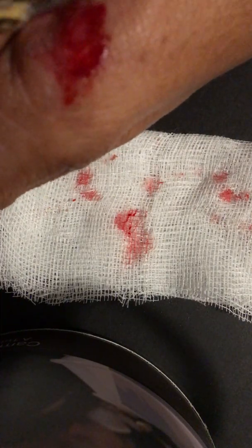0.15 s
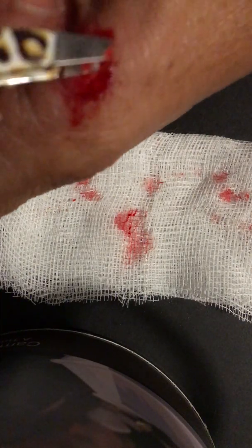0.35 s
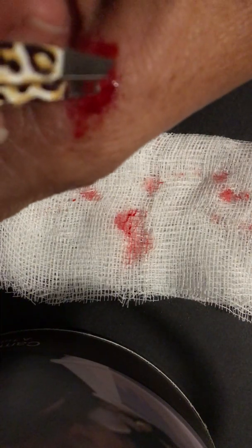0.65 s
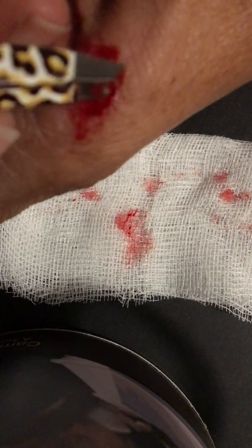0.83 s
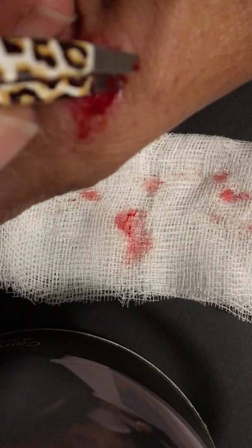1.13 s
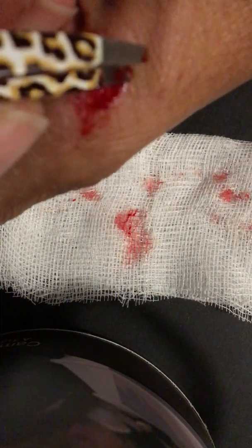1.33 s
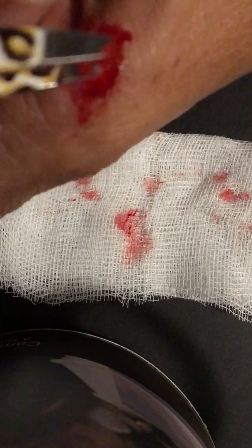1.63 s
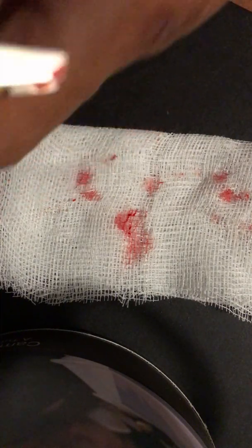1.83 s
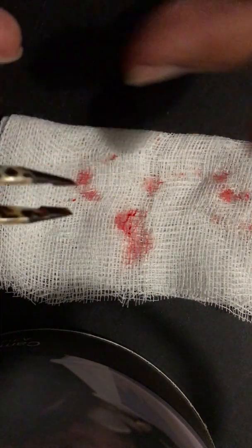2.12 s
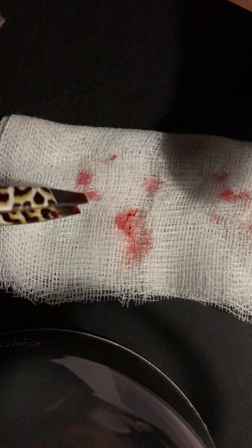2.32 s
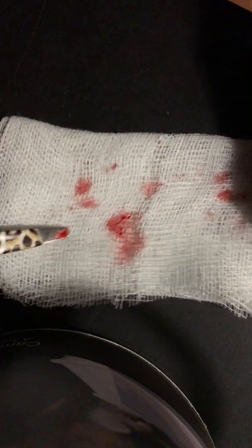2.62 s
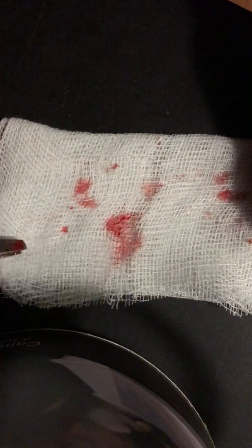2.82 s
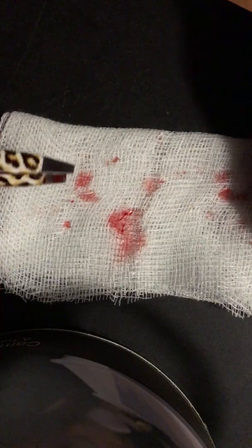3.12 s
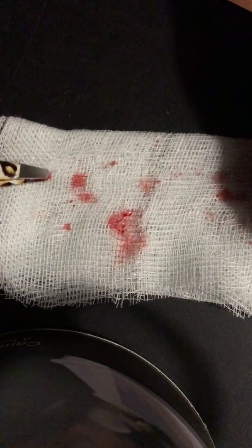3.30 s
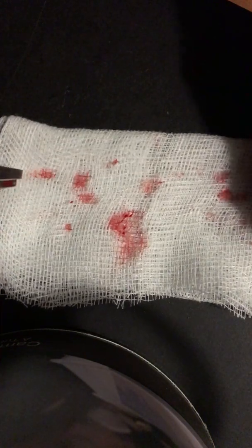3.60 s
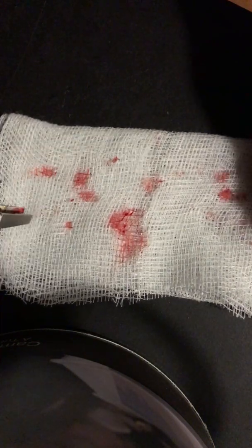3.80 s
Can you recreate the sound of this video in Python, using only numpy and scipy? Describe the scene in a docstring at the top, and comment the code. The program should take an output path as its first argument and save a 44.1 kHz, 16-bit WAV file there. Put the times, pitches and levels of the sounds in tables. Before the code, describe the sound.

Steel tweezers heard close in a quiet, slightly reflective room with low hiss and hum. A bright snap at 0.3 s, then near silence with dull hand bumps; soft rustling from 1.5 s. Small ticks around 2.2-2.4 s, a tap at 2.55 s, faint gauze scraping, a louder tap at 3.2 s, a barely audible thin squeak, scrapes and clicks to 3.7 s, then the loudest tap with rapid bounces at 3.9 s.

```python
"""Steel tweezers on a gauze-covered table

Close up in a quiet room: a snap, three taps with bounces, scrapes of the tips over gauze, a thin squeak.
Tweezer arms and table are sums of dying sines, driven by strikes, scuffs or random thread plucks.
Skin and cloth rustle as shaped noise; hands bump as sagging low sines; hiss, hum and rumble lie below.
"""
import sys
import numpy as np
from scipy import signal
from scipy.fft import rfft, irfft
from scipy.io import wavfile
from scipy.ndimage import uniform_filter1d

SR = 44100
rng = np.random.default_rng(int(sys.argv[2]) if len(sys.argv) > 2 else 0)


def wrap_up_sound(samples):
    """Save the sound to the file named by the first command line argument, as 16-bit audio."""
    columns = np.atleast_2d(samples).T
    # keep every value between -1 and 1, then stretch to whole-number steps
    tamed = np.clip(columns, -1, 1)
    steps = np.round(tamed * 32767).astype(np.int16)
    wavfile.write(sys.argv[1], SR, steps)


N = 174195


def gain_of(db):
    """Amplitude factor of a level in dB."""
    return 10 ** (np.asarray(db) / 20)


def unit_rms(x):
    """Scale to an RMS of 1."""
    return x / np.sqrt(np.mean(x ** 2) + 1e-20)


def read_curve(points, hz):
    """Interpolate a (frequency, value) table along log frequency."""
    point_hz, value = np.transpose(points)
    return np.interp(np.log(hz + 1), np.log(point_hz + 1), value)


def level(rows, column=1):
    """Gain over time from a dB column; -120 dB outside the table."""
    rows = np.array(rows)
    return gain_of(np.interp(np.arange(N) / SR, rows[:, 0], rows[:, column], -120, -120))


def add(mix, start_s, sound):
    """Add a sound in place, cut at the end of the mix."""
    part = mix[round(start_s * SR):][:len(sound)]
    part += sound[:len(part)]


def drift(size):
    """Slow random curve of unit RMS: white noise averaged over size samples."""
    return unit_rms(uniform_filter1d(rng.standard_normal(N), size=size))


def ring(modes, tilt_db_per_oct, size=6000):
    """Dying sines, tilted about 1 kHz; neighbouring modes start in opposite directions."""
    t = np.arange(size) / SR
    out = np.zeros(size)
    for k, (hz, db, t60_s) in enumerate(modes):
        mode_db = db + tilt_db_per_oct * np.log2(hz / 1000) - 60 * t / t60_s
        out += (-1) ** k * gain_of(mode_db) * np.sin(2 * np.pi * hz * t)
    return out


def patchy_noise(colour, patch_db):
    """Coloured noise whose level drifts in patches over time and frequency."""
    frames, hz = N // 128 + 5, np.fft.rfftfreq(512, 1 / SR)
    real, imag, patch = rng.standard_normal((frames, 257, 3)).T
    patch = uniform_filter1d(patch, size=10, axis=0)
    patch = unit_rms(uniform_filter1d(patch, size=14, axis=1))
    spectrum = (real + 1j * imag) * gain_of(read_curve(colour, hz)[:, None] + patch_db * patch)
    return unit_rms(signal.istft(spectrum, nperseg=512, noverlap=384)[1][:N])


# spectrum of the steady hiss: hz, level_db
HISS_COLOUR = [(12, -49), (20, -14.5), (33, -3.5), (54, -0.5), (76, -12), (285, -12), (502, -27),
               (546, -19), (884, -13), (962, -19), (1600, -23), (1740, -23.5), (7580, -34.5), (9230, -34.5),
               (17200, -43)]
# low rumble, before RUMBLE_TRIM_DB: time_s, level_db
RUMBLE_LEVEL = [(0.0, -69), (0.3, -65), (1.33, -70), (1.91, -59), (2.22, -69.5), (3.95, -61.5)]
HISS_DB, RUMBLE_TRIM_DB = -68, -3
HUM_HZ, HUM_DB = 51, -71.5


def room_tone():
    """Steady hiss, a hum of wavering pitch and a low rumble that swells."""
    hz = np.fft.rfftfreq(N, 1 / SR)
    spectrum = rng.standard_normal(len(hz)) + 1j * rng.standard_normal(len(hz))
    hiss = unit_rms(irfft(spectrum * gain_of(read_curve(HISS_COLOUR, hz)), N))
    rumble_colour = [(60, -34), (110, 6), (300, -2), (700, -11), (2000, -74)]  # hz, level_db
    rumble = level(RUMBLE_LEVEL) * patchy_noise(rumble_colour, 1.73)
    waver = 1 + 0.077 * drift(3000)
    hum = gain_of(HUM_DB) * np.sin(2 * np.pi * HUM_HZ * np.cumsum(waver) / SR)
    return gain_of(HISS_DB) * hiss + gain_of(RUMBLE_TRIM_DB) * rumble + hum


# skin and cloth: time_s, level_db
RUSTLE_LEVEL = [(0, -80), (.03, -73), (.11, -82), (.288, -72.5), (.293, -74), (.306, -65), (.32, -71),
                (.4, -80.5), (1.43, -84.5), (1.5, -68.5), (1.54, -82.5), (1.785, -77), (1.8, -65.5),
                (1.85, -63), (1.9, -68.5), (1.96, -64.5), (2.04, -71.5), (2.09, -77), (2.105, -63),
                (2.135, -68), (2.15, -75), (2.33, -71.5), (2.41, -73), (2.8, -64.5), (2.97, -71),
                (3.1, -65.5), (3.16, -73.5), (3.31, -69.5), (3.43, -74.5), (3.6, -71), (3.74, -76),
                (3.95, -80)]
# rustle spectrum: hz, level_db
RUSTLE_COLOUR = [(880, -26), (1500, -10), (2210, -3.5), (3720, -16), (4120, -9.5), (8500, -4), (10300, -8),
                 (11900, -4.5), (17200, -14)]


def rustle():
    """Rubbing skin and cloth: patchy hiss with a slightly grainy level."""
    grain = gain_of(2.0 * drift(300))
    return level(RUSTLE_LEVEL) * unit_rms(grain * patchy_noise(RUSTLE_COLOUR, 2.5))


# tweezer arm modes: hz, level_db, t60_s
ARM_MODES = [(3060, 1, 0.005), (5610, -6.5, 0.013), (8180, -2.5, 0.013), (11990, -3.5, 0.013),
             (13900, -21, 0.0085), (16000, -1, 0.0094)]
# clicks of the tips: start_s, ring_peak_db, tilt_db_per_oct
CLICKS = [(0.2903, -36.5, 5.2), (1.488, -67, 3), (2.2458, -62, -3), (2.424, -52.5, -2), (2.9054, -56, 7),
          (3.2965, -52, -2), (3.5654, -49, -2.5), (3.6025, -50, -4), (3.6556, -41.5, 1)]
# ring of a small dull tick: hz, level_db, t60_s
TICK_MODES = [(2410, -2, 0.018), (3100, 0.43, 0.015)]
TICK_S, TICK_DB, TICK_ATTACK_S = 2.371, -52, 0.0006
SCUFF_DB, SCUFF_T60_S, SCUFF_HISS_DB = -21, 0.04, -20  # hiss relative to ring peak


def clicks():
    """The arms ring briefly and keep ringing through a short hissing scuff; one dull tick."""
    out, t = np.zeros(N), np.arange(3000) / SR
    scuffs = rng.standard_normal((len(CLICKS), 3000)) * gain_of(-60 * t / SCUFF_T60_S)
    for (start_s, peak_db, tilt), scuff in zip(CLICKS, scuffs):
        drive = np.r_[1, gain_of(SCUFF_DB) * scuff[1:]]
        sound = signal.oaconvolve(drive, ring(ARM_MODES, tilt, size=1000))
        add(out, start_s, gain_of(peak_db) * sound / abs(sound).max())
        add(out, start_s, gain_of(peak_db + SCUFF_HISS_DB) * np.diff(scuff))
    attack = np.minimum(t[:2000] / TICK_ATTACK_S, 1)
    add(out, TICK_S, gain_of(TICK_DB) * ring(TICK_MODES, 0, size=2000) * attack)
    return out


# taps and bounces: start_s, level_db, tilt_db_per_oct,
# spot_db (added to table modes just below SPOT_HZ, taken from those just above)
TAPS = [(0.2912, -46, -3.5, 2), (2.5492, -24.5, -4, -0.5), (2.553, -43, 3, 1), (3.1916, -16, 0, -1.5),
        (3.197, -29.5, 0.5, -12), (3.8823, -6.5, 1.5, 3.5), (3.8878, -11.5, 1, -2.5),
        (3.8911, -18.5, 0.5, -5), (3.8942, -20, -2, 16), (3.8975, -26.5, -4.5, 19)]
# table top modes: hz, level_db, t60_s
TABLE_MODES = [(198, -18, 0.032), (488.3, -9, 0.04), (673, -6.5, 0.055), (805, 0, 0.028), (985, -8, 0.069),
               (1184, -11.5, 0.12), (1400, -9, 0.069), (1650, -12.5, 0.11), (1994, 3, 0.03),
               (2320, 0.5, 0.027), (2480, -7, 0.064), (3000, -11.5, 0.059), (4600, -3.5, 0.021),
               (7300, -4, .014)]
STRIKE_HZ, STRIKE_SIGMA_S = 1850, 0.0001796  # pitch at zero tilt
CRACK_DB, CRACK_T60_S = -25.5, 0.028  # level at zero tilt
RING_DB, CONTACT_S = -8, 0.0001
SPOT_HZ, SPOT_REACH_HZ = 2170, 250


def taps():
    """A one-cycle strike, a crack of treble and the table's ring, softened by contact time."""
    out, t = np.zeros(N), np.arange(6000) / SR
    crack_band = signal.butter(2, [3800, 7500], "band", fs=SR)
    cracks = signal.lfilter(*crack_band, rng.standard_normal((len(TAPS), 6000)))
    contact = t[:200] * np.exp(-t[:200] / CONTACT_S)
    contact /= contact.sum()
    for (start_s, db, tilt, spot_db), crack in zip(TAPS, cracks):
        u = t - 3 * STRIKE_SIGMA_S
        strike = -np.sin(2 * np.pi * STRIKE_HZ * gain_of(tilt) * u)
        strike *= np.exp(-(u / STRIKE_SIGMA_S) ** 2 / 2)
        crack = gain_of(CRACK_DB + 2 * tilt - 60 * t / CRACK_T60_S) * crack
        modes = []
        for hz, mode_db, t60_s in TABLE_MODES:
            below_hz = SPOT_HZ - hz
            near_spot = abs(below_hz) < SPOT_REACH_HZ
            modes.append((hz, mode_db + spot_db * np.sign(below_hz) * near_spot, t60_s))
        body = np.convolve(ring(modes, tilt), contact)[:len(t)]
        add(out, start_s, gain_of(db) * (strike + crack + gain_of(RING_DB) * body))
    return out


# decay of the reflections: hz, t60_s
ROOM_T60 = [(200, 0.22), (800, 0.16), (2500, 0.16), (8000, 0.096)]
ROOM_WET_DB = -12


def room(x):
    """Sparse reflections, each band dying at its own speed."""
    size = SR // 2
    hits = np.zeros(size)
    at = np.arange(200, size - 20, 20)
    hits[at + rng.integers(0, 20, len(at))] = rng.choice([-1., 1.], len(at))
    hz, t, spectrum = signal.stft(hits, SR, nperseg=256)
    decay = gain_of(-60 * t / read_curve(ROOM_T60, hz)[:, None])
    tail = signal.istft(spectrum * decay, SR, nperseg=256)[1]
    return signal.fftconvolve(x, tail / np.linalg.norm(tail))[:N]


# hand bumps and thuds under taps: start_s, level_db, start_pitch_above_end_hz, t60_s
BUMPS = [(0.2918, -40, 710, 0.13), (.65, -58, 150, 0.062), (1.451, -51.5, 198, 0.14),
         (1.666, -48.5, 251, 0.075), (1.795, -51, 250, 0.14), (1.838, -63, 200, .08),
         (2.107, -42, 298, 0.043), (2.551, -57, 300, 0.09), (3.191, -44.5, 300, 0.064),
         (3.304, -66, 200, 0.059), (3.883, -36, 400, 0.09)]
BUMP_END_HZ, BUMP_SAG_TURNS, BUMP_ATTACK_S = 21.6, 0.74, 0.0031


def bumps():
    """Low pushes whose pitch sags in inverse proportion to time."""
    out, t = np.zeros(N), np.arange(6000) / SR
    for start_s, db, sag_hz, t60_s in BUMPS:
        pitch_hz = BUMP_END_HZ + BUMP_SAG_TURNS / (t + BUMP_SAG_TURNS / sag_hz)
        envelope = gain_of(db - 60 * t / t60_s) * np.minimum(t / BUMP_ATTACK_S, 1)
        add(out, start_s, envelope * np.sin(2 * np.pi * np.cumsum(pitch_hz) / SR))
    return out


# scrapes, one list each: time_s, table_rumble_db, arm_ring_db
DRAGS = [
    [(2.58, -60.5, -81), (2.67, -61, -83), (2.73, -62.5, -73), (2.79, -56, -70), (2.85, -64, -77),
     (2.94, -68, -84), (3, -77, -90.5)],
    [(3.23, -62, -90), (3.25, -56.5, -90), (3.28, -52.5, -81), (3.3, -45.5, -74), (3.33, -61, -68),
     (3.38, -69, -81), (3.41, -65.5, -72)],
    [(3.48, -85, -95), (3.52, -75, -69.5), (3.58, -63.5, -64.5), (3.62, -66, -68.5), (3.66, -66.5, -66.5),
     (3.71, -73, -71), (3.75, -80, -106)],
]
# table resonances under the drag: hz, width_hz, level_db
DRAG_BODY = [(210, 34, 6), (919, 110, 15.5), (2220, 1040, -2), (7300, 340, -20)]
PLUCKS_PER_S, PLUCK_SPREAD_DB = 2100, 1.5


def thread_plucks():
    """Impulses at random times, of random sign and strength."""
    strength = gain_of(PLUCK_SPREAD_DB * np.minimum(rng.exponential(1, N), 4))
    happens = rng.random(N) < PLUCKS_PER_S / SR
    return strength * happens * rng.choice([-1, 1], N)


def drag():
    """Threads pluck the tips: the table hums and the arms ring."""
    plucks, t = thread_plucks(), np.arange(2000) / SR
    body = np.zeros(len(t))
    for hz, width_hz, db in DRAG_BODY:
        body += gain_of(db) * width_hz * np.exp(-np.pi * width_hz * t) * np.sin(2 * np.pi * hz * t)
    table = unit_rms(signal.oaconvolve(plucks, body)[:N])
    arms = unit_rms(signal.oaconvolve(plucks, ring(ARM_MODES, 1.9, size=1000))[:N])
    return sum(level(d) * table + level(d, column=2) * arms for d in DRAGS)


# faint squeak, level before flicker: time_s, pitch_hz, level_db
SQUEAK = [(3.12, 10100, -91.5), (3.17, 10550, -72.5), (3.25, 10840, -83), (3.3, 11200, -68),
          (3.35, 10600, -79), (3.42, 10000, -90)]


def squeak():
    """A thin gliding sine whose level flickers."""
    time_s, point_hz, _ = np.transpose(SQUEAK)
    flicker = gain_of(2.5 * drift(400))
    pitch_hz = np.interp(np.arange(N) / SR, time_s, point_hz)
    return level(SQUEAK, column=2) * flicker * np.sin(2 * np.pi * np.cumsum(pitch_hz) / SR)


def scene():
    """Sum of all layers; only taps and clicks excite the reflections."""
    near = taps() + clicks()
    wet = gain_of(ROOM_WET_DB) * room(near)
    return (room_tone() + rustle() + near + wet + bumps() + drag() + squeak())[None]


MIC_LOW_HZ, EDGE_HZ = 41.5, 17250
DIP_HZ, DIP_WIDTH_HZ, DIP_DB = 10550, 167, -5.5


def record(dry):
    """The microphone dips narrowly in the treble and drops the deepest bass; then the band limit."""
    hz = np.fft.rfftfreq(N, 1 / SR)
    dip = gain_of(DIP_DB * np.exp(-((hz - DIP_HZ) / DIP_WIDTH_HZ) ** 2))
    dipped = irfft(rfft(dry) * dip, N)
    x = signal.lfilter(*signal.butter(4, MIC_LOW_HZ, "high", fs=SR), dipped)
    band_limit = signal.firwin(511, EDGE_HZ, window=("kaiser", 9), fs=SR)
    return signal.oaconvolve(x, band_limit[None], "same")


dry = scene()
out = record(dry)
wrap_up_sound(out)
```